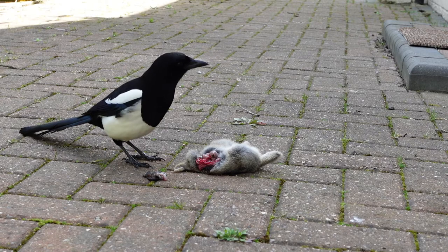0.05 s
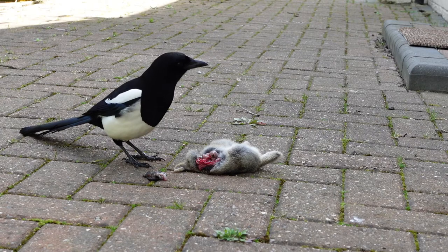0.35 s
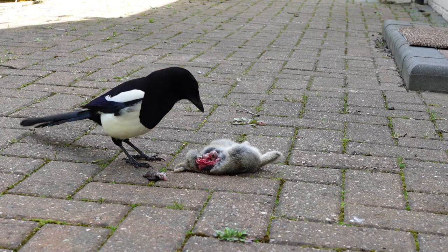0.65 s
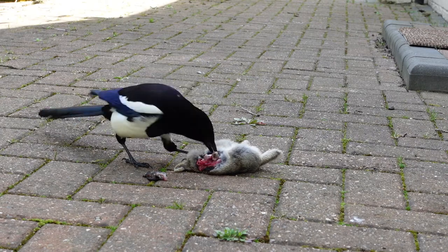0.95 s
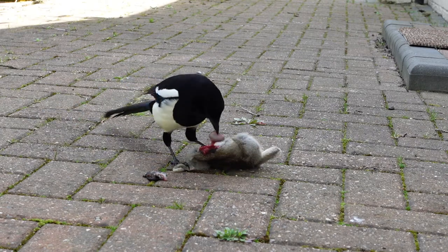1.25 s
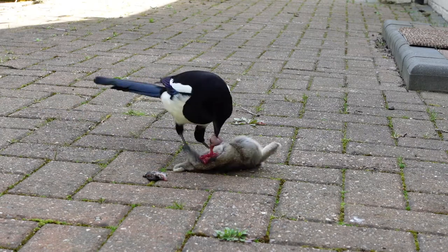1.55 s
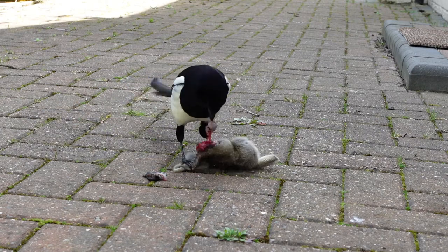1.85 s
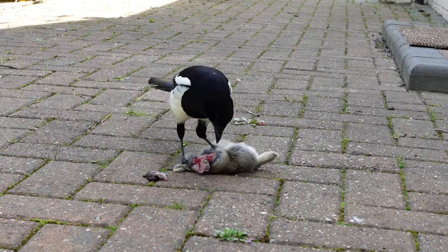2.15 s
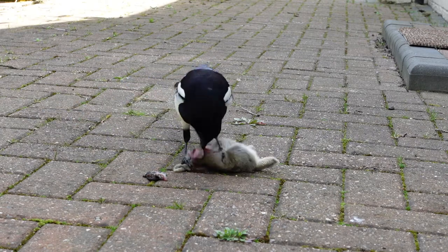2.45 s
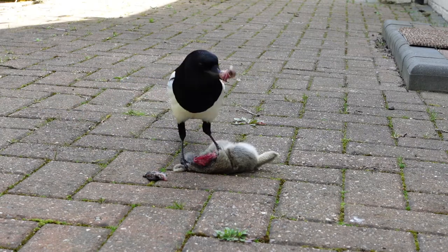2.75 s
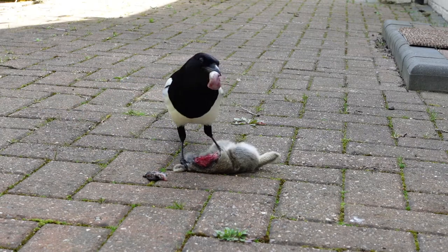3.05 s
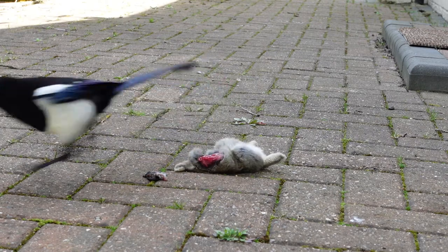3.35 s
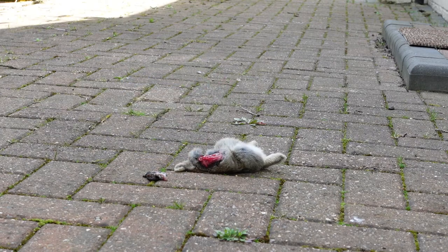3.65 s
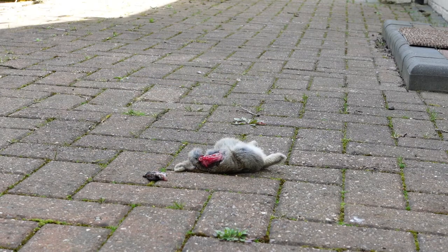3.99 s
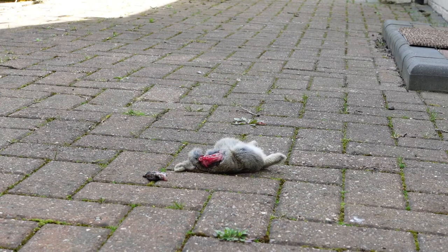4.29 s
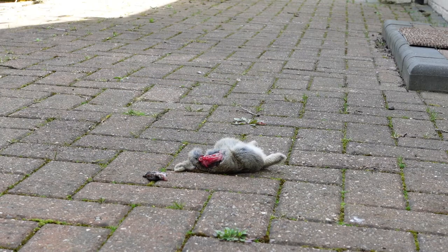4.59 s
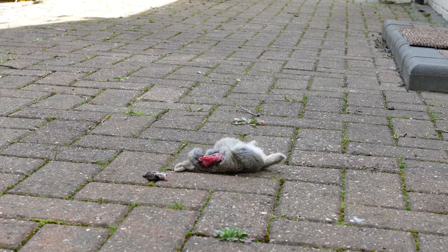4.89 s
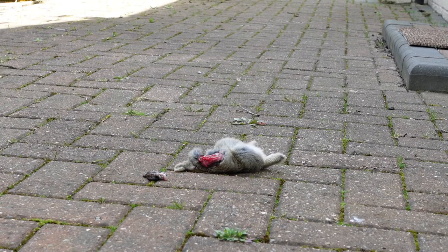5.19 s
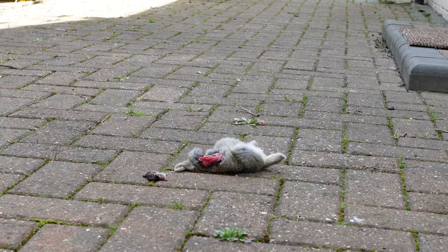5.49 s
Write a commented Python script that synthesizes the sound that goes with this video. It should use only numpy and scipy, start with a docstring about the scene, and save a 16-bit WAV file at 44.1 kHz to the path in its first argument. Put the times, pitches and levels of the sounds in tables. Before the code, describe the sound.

A small bird repeats down-sweeping chirps over distant traffic, while a magpie snaps its bill, then hops off with ticks and a brief flutter.

```python
"""Down-sweeping chirps of a small bird beside a house, thrown back by a wall and ringing in the yard.
Other birds add thin high whistles, a trill and, farther off, fluting. On the paving a magpie pecks,
snaps its bill, hops off and flutters away; soft puffs of air reach the microphone.
Underneath, a distant engine revs in bursts over the rumble of traffic."""
import sys
import numpy as np
from scipy import signal
from scipy.fft import rfft, irfft, next_fast_len
from scipy.io import wavfile
from scipy.ndimage import uniform_filter1d, map_coordinates

SR = 44100
rng = np.random.default_rng(int(sys.argv[2]) if len(sys.argv) > 2 else 0)


def waveform_to_disk(signal):
    """Save audio, clipped to [-1, 1], as 16-bit WAV at the path in sys.argv[1]."""
    frames = np.transpose(np.atleast_2d(signal))
    scaled = np.clip(frames, -1, 1) * 32767
    samples = np.round(scaled).astype(np.int16)
    wavfile.write(sys.argv[1], SR, samples)


N = 248283
TIME = np.arange(N) / SR

# Chirp shapes: (position in the note [0-1], pitch [ratio], level [dB])
SLIDE_SHAPE = [(0, 1.89, -22), (.07, 1.78, -7), (.145, 1.46, 1), (.22, 1.18, -7), (.32, 1.05, -6),
               (.5, 1.0, -2), (.72, .985, -1), (.88, .975, -10), (1, .98, -26)]
ARCH_SHAPE = [(0, .9, -18), (.15, .97, -4), (.36, 1.03, 0), (.55, .99, -1), (.7, .86, -3), (.87, .81, -9),
              (1, .79, -26)]
STEP_SHAPE = [(0, 1.3, 2), (.06, 1.18, -0.5), (.13, .99, 7.5), (.27, 1.01, 1.5), (.36, .95, 3.5),
              (.42, .76, -1.5), (.52, .6, -15.5), (.8, .562, -17.5), (1, .565, -26)]
SLUR_SHAPE = [(0, 1.22, -13), (.12, 1.05, -2), (.25, 1, 2), (.38, .99, -5.5), (.47, 0.74, -8),
              (.6, .68, -15), (.8, .635, -8.5), (1, .63, -28)]
PIP_SHAPE = [(0, .94, -14), (.2, .985, -3), (.5, 1.02, 0), (.8, 1, -4), (1, .96, -16)]
# Chirps sung in each shape: (time [s], length [s], pitch [Hz], level [dB])
SLIDE_NOTES = [(0.69, 0.049, 4050, -20), (1.364, 0.057, 3898, -17.5), (2.03, .054, 4036, -18.5),
               (2.666, 0.066, 4000, -19.5)]
ARCH_NOTES = [(.731, 0.043, 4433, -20), (1.414, 0.052, 4660, -22), (2.082, .06, 4554, -22.5),
              (2.723, 0.044, 4560, -24)]
STEP_NOTES = [(1.021, 0.095, 5767, -22.5), (1.682, 0.096, 5670, -22), (2.336, .106, 5740, -23.5)]
SLUR_NOTES = [(.345, 0.095, 5720, -21.5)]
PIP_NOTES = [(1.13, 0.027, 4037, -25.5), (1.784, 0.056, 4074, -26), (2.463, 0.0493, 3775, -32.5)]
# The top of the song sits right of the microphone: (frequency [Hz], left minus right [dB])
SONG_BALANCE = [(3800, 1), (4600, 1), (5400, -2.5), (7500, -2.5)]

def chirping_bird(wall_delay_s=.0142):
    """A bird beside the house; leaves blur the straight path, so the wall's echo is the louder one."""
    song = notes(SLIDE_SHAPE, SLIDE_NOTES, waver=.013)
    song += notes(ARCH_SHAPE, ARCH_NOTES, waver=.027)
    song += notes(STEP_SHAPE, STEP_NOTES, waver=.018)
    song += notes(SLUR_SHAPE, SLUR_NOTES, waver=.0085)
    song += notes(PIP_SHAPE, PIP_NOTES, waver=.028)
    through_leaves = amp(-15) * song + amp(-14) * scatter(song, t60=.06, delay=0, alike=.5)
    wall = amp(-4) * np.interp(TIME - wall_delay_s, TIME, song, left=0)
    early_yard = amp(-5) * scatter(song, t60=.17, delay=.015, alike=.66)
    late_yard = amp(-11) * scatter(song, t60=.45, delay=.03, alike=.7)
    at_microphone = through_leaves + wall + early_yard + late_yard
    return filtered(at_microphone, lambda hz: amp(np.outer([.5, -.5], along(SONG_BALANCE, hz))))

# Whistles: (time [s], length [s], first, middle, last pitch [Hz], level [dB], left minus right [dB])
THIN_WHISTLES = [(0.916, 0.51, 8090, 8140, 8430, -42, 8), (1.453, .11, 7480, 7100, 7150, -47, 2),
                 (2.16, 0.21, 8725, 8190, 7630, -39.5, 5.5), (2.396, .135, 7320, 6640, 6560, -32.5, -5),
                 (2.561, 0.12, 7420, 6630, 6950, -29, -5.5)]

def whistling_bird(flutter_db=2):
    """A second bird draws out thin, fluttering high notes, left of the microphone and then right."""
    direct = song = 0
    for *call, left_db in THIN_WHISTLES:
        flutter = amp(-2 + flutter_db * wobble(44.9))
        note = flutter * whistle(arc(*call, attack=.25, release=.28, edge_db=-11.5), waver=.0058)
        direct += lean(left_db) * note
        song += note
    early_yard = amp(-9) * scatter(song, t60=.16, delay=.0068, alike=1)
    late_yard = amp(-12) * scatter(song, t60=.61, delay=.023, alike=1)
    return direct + early_yard + late_yard

# One rising note: (position in the note [0-1], pitch [ratio], level [dB])
TRILL_SHAPE = [(0, .98, -20), (.3, .955, -8), (.55, .97, -6), (.76, 1.01, 0), (.9, 1.05, -2),
               (1, 1.07, -18)]
# The run: (time [s], length [s], pitch [Hz], level [dB])
TRILL_NOTES = [(2.73, 0.064, 4990, -30.5), (2.85, 0.054, 4940, -30.5), (2.958, 0.062, 5015, -29),
               (3.07, 0.07, 4950, -28.5), (3.19, 0.066, 4880, -27), (3.314, .055, 4896, -30),
               (3.433, .066, 4840, -28.5)]

def trilling_bird():
    """A soft run of rising notes off to the right, partly blurred by foliage."""
    song = notes(TRILL_SHAPE, TRILL_NOTES, waver=.016)
    blurred = amp(-3) * song + amp(-4) * scatter(song, t60=.07, delay=0, alike=.8)
    yard = amp(-7) * scatter(song, t60=.59, delay=.022, alike=.84)
    return lean(left_db=-4) * blurred + yard

# Ticks on the paving, and the bill shutting: (time [s], level [dB])
PAVING_TICKS = [(1.1199, -39), (1.2526, -33.5), (1.2984, -39), (1.8823, -36), (3.271, -24.5), (3.38, -28.5),
                (3.449, -29), (3.511, -30), (3.5244, -31.5), (3.5662, -24), (3.7569, -33), (3.7978, -31),
                (5.1764, -38), (5.3168, -31.5)]
BILL_SNAP = [(2.675, -11.5)]
# Resonances of the bill: (frequency [Hz], level [dB], time to fall 60 dB [s])
BILL_MODES = [(1020, -22, 0.023), (4600, -33, 0.0028), (8530, 8.5, 0.002), (12000, -7, 0.0054)]

def magpie_clicks(tick_t60=.0042):
    """Out in the yard, claws and bill tick on stone; the bill snaps once with a very short ring."""
    track = np.zeros(N)
    t = np.arange(SR // 20) / SR
    bright = signal.butter(1, [5000, 13000], "bandpass", fs=SR, output="sos")
    for s, db in PAVING_TICKS:
        burst = rng.standard_normal(len(t)) * amp(-60 * t / tick_t60)
        add(track, s, amp(db + 3) * signal.sosfilt(bright, burst))
    ring = sum(amp(db - 60 * t / t60) * np.sin(2 * np.pi * hz * t) for hz, db, t60 in BILL_MODES)
    for s, db in BILL_SNAP:
        add(track, s, amp(db - 2) * ring)
    return track + amp(-11) * scatter(track, t60=.14, delay=.00063, alike=.66)

# The magpie keeps stirring; once it turns and pushes off: (time [s], level [dB])
FIDGET_LEVEL = [(.95, -80), (1.1, -66), (3.05, -62.5), (3.2, -55), (3.65, -58), (4.0, -53), (4.65, -63.5),
                (5.63, -58)]
HOP_LEVEL = [(3.1, -77), (3.16, -41), (3.27, -41), (3.34, -47), (3.42, -80)]
# Brief high hisses (feather and foot scuffs, the bright top of two chirps, the bill snap's tail)
# and dull tugs of the bill: (time [s], half length [s], level [dB])
HIGH_HISSES = [(1.34, .04, -54), (1.71, .03, -56), (2.06, 0.038, -60), (2.46, .02, -57), (2.688, .018, -43),
               (2.78, 0.024, -47.5), (3.19, .045, -45.5), (3.28, 0.05, -45), (3.52, 0.071, -50),
               (3.755, .025, -48.5), (3.855, 0.031, -42.5), (3.915, 0.017, -43), (4.17, .045, -54),
               (4.312, .022, -47), (4.378, 0.016, -46), (4.51, 0.016, -53.5), (4.726, 0.016, -50),
               (5.152, 0.015, -53), (5.32, 0.044, -52)]
BILL_TUGS = [(1.262, 0.013, -49), (1.325, 0.027, -56)]
# The high hiss and the whole plumage: (frequency [Hz], level [dB])
HISS_SPECTRUM = [(400, -10), (1200, 4), (3000, -1), (6000, 0), (9000, 0), (13000, -0.5), (15800, -4.5)]
PLUMAGE_SPECTRUM = [(250, -10), (480, 1), (1300, -8), (3800, 1.5), (6500, -3), (11000, -24)]

def rustle_and_hisses():
    """Grainy rustle of the magpie, with brief high hisses; its hop sweeps the plumage and is fuller."""
    hop_db, = curves(HOP_LEVEL)
    fidget_db, = curves(FIDGET_LEVEL)
    grains = unit(amp(2 * wobble(900) + 1.9 * wobble(60)))
    stirring = amp(fidget_db + 2.7 * wobble(12))
    hiss = amp(2) * np.hypot(stirring, swells(HIGH_HISSES)) * noise(HISS_SPECTRUM)
    body = (amp(hop_db - 2) + swells(BILL_TUGS)) * noise(PLUMAGE_SPECTRUM)
    return grains * (hiss + body)

# Puffs of air: (time [s], half length [s], level [dB])
AIR_PUFFS = [(1.003, 0.025, -39), (1.25, 0.027, -42), (1.326, 0.067, -35.5), (3.742, 0.042, -32.5)]
# Their low thud: (frequency [Hz], level [dB])
PUFF_SPECTRUM = [(20, -34), (50, -9), (85, -3.5), (150, -5), (300, -42), (1000, -70)]

def air_puffs():
    """Soft low puffs of air reach the microphone."""
    return swells(AIR_PUFFS) * noise(PUFF_SPECTRUM)

# Soft, echoing calls: one quiet falling chirp of the nearby bird (two rows), then far birds:
# (time [s], length [s], first, middle, last pitch [Hz], level [dB])
ECHOING_CALLS = [(.003, 0.023, 6920, 5000, 4300, -42), (.02, .055, 4520, 4390, 4315, -35.5),
                 (0.206, 0.13, 8700, 8100, 6600, -60.5), (0.279, 0.57, 1869, 2040, 2050, -47.5),
                 (.565, .11, 4110, 4065, 4284, -39.5), (0.543, .13, 4860, 4900, 5100, -47),
                 (0.792, .18, 2170, 2104, 2310, -37.5), (0.879, .33, 2400, 2344, 2436, -42.5),
                 (3.953, .52, 1908, 1980, 1833, -52), (4.44, .16, 2150, 2380, 2602, -47),
                 (4.539, .16, 5800, 5400, 5100, -59), (4.848, .2, 8460, 7560, 7250, -58.5)]
# A far harsh call, a nearer fluted note, a quick rising squeak: (time [s], pitch [Hz], level [dB])
HARSH_CALL = [(4.77, 4200, -51), (4.83, 4400, -43), (4.88, 4568, -40.5), (4.92, 4650, -56),
              (4.95, 4817, -63)]
FLUTED_NOTE = [(5.39, 2260, -52), (5.44, 2356, -40), (5.485, 2310, -38.5), (5.51, 2133, -45),
               (5.58, 2066, -41.5), (5.63, 2127, -61)]
SQUEAK = [(3.838, 1596, -59), (3.852, 2280, -41), (3.864, 2550, -39), (3.878, 2880, -58)]

def soft_calls():
    """One quiet chirp and the far birds sound as echo alone; fluted note and squeak arrive directly."""
    calls = sum(whistle(arc(*call, attack=.42, release=.37, edge_db=-4), waver=.0318)
                for call in ECHOING_CALLS)
    calls += whistle(HARSH_CALL, waver=.067)
    fluted = whistle(FLUTED_NOTE, waver=.014)
    calls_echo = scatter(calls, t60=.45, delay=0, alike=.82)
    squeak = amp(-1) * lean(left_db=3.6) * whistle(SQUEAK, waver=.057)
    fluted_echo = amp(-4) * scatter(fluted, t60=.2, delay=.011, alike=.56)
    return calls_echo + squeak + amp(-3) * fluted + fluted_echo

# Bursts of throttle: (time [s], length [s], firing rate [Hz], level [dB])
ENGINE_REVS = [(0.398, 0.16, 123, -35), (0.923, 0.39, 124.5, -33), (1.565, 0.15, 121.5, -33.5),
               (3.026, .11, 114.9, -35), (3.662, .29, 122.5, -32.5), (4.082, 0.923, 124, -31),
               (5.37, .13, 121, -38.5)]
# The engine at idle, and a second motor's drone: (time [s], level [dB])
IDLE_LEVEL = [(0, -45), (2.1, -40), (3.0, -43), (3.5, -50), (3.95, -38.5), (5.0, -39), (5.2, -58),
              (5.5, -46)]
DRONE_LEVEL = [(0, -39.5), (.25, -52.5), (1.3, -50), (2.1, -44.5), (2.45, -41.5), (2.9, -45.5), (3.3, -53),
               (4.7, -51), (5.1, -44), (5.63, -44.5)]

def far_motors(idle_hz=111.7, drone_hz=161.1, ramp_s=.086, sag_hz_per_s=7.57, sag_db_per_s=2.5):
    """Far off, the throttle lifts an engine's speed and level; both sag under load while it is held."""
    idle_db, = curves(IDLE_LEVEL)
    drone_db, = curves(DRONE_LEVEL)
    hz, db = idle_hz, idle_db
    for s, length, rev_hz, rev_db in ENGINE_REVS:
        held = TIME - s
        throttle = np.clip(np.minimum(held, length - held) / ramp_s + .5, 0, 1)
        hz = hz + throttle * (rev_hz - sag_hz_per_s * held - idle_hz)
        db = db + throttle * (rev_db - sag_db_per_s * held - idle_db)
        drone_db -= 10.5 * throttle  # the drone fades during a rev
    engine = motor_hum(hz, db - 1, unsteady=.0094, swing_db=.7, octave_db=-19.5)
    drone = motor_hum(drone_hz, drone_db, unsteady=.0214, swing_db=1.5, octave_db=-27.5)
    return engine + drone

def motor_hum(hz, db, unsteady, swing_db, octave_db):
    """A distant hum wavers in speed and level; reflections shift its phase between left and right."""
    phase = 2 * np.pi * np.cumsum(hz * (1 + unsteady * wobble(20))) / SR
    phase = phase + .15 * np.outer([1, -1], wobble(4.1))
    gain = np.sqrt(2) * amp(db + swing_db * wobble(14))
    return gain * (np.sin(phase) + amp(octave_db) * np.sin(2 * phase))

# Rumble from the road: (time [s], level [dB])
ROAD_LEVEL = [(0, -43), (.7, -42), (1.35, -41), (2.1, -43), (2.85, -42), (3.3, -44.5), (4.2, -42.5),
              (5.1, -40.5), (5.63, -40.5)]
# Road rumble and tyre wash: (frequency [Hz], level [dB])
RUMBLE_SPECTRUM = [(15, -65), (25, -48), (38, -19), (64, -17), (92, -4.5), (107, -4), (134, -4.5),
                   (166, -5), (188, -10.5), (219, -6), (248, -13), (271, -11.5), (500, -28), (650, -54),
                   (1100, -120)]
TYRE_SPECTRUM = [(200, -5), (450, -0.5), (650, 2), (950, 5), (1400, 0.5), (1900, -1), (2800, -9),
                 (4500, -6), (6500, -12.5), (9000, -21), (15500, -22)]

def traffic():
    """Distant motors swell and fade over road rumble and tyre wash, a little to the right."""
    road_db, = curves(ROAD_LEVEL)
    rumble = amp(road_db + .66 * wobble(6)) * noise(RUMBLE_SPECTRUM)
    wash = amp(-47 + .32 * wobble(3.11)) * noise(TYRE_SPECTRUM)
    return lean(left_db=-.5) * (far_motors() + rumble + wash)

# Likeness of the microphone's two sides: (frequency [Hz], correlation [0-1])
STEREO_LIKENESS = [(30, 0.091), (70, 0.92), (140, 0.99), (280, 0.64), (1200, 0.69), (5000, 0.72),
                   (12000, 1)]

def noise(spectrum):
    """Coloured stereo noise of rms 1."""
    def response(hz):
        width = np.arccos(np.clip(along(STEREO_LIKENESS, hz), -1, 1)) / 2
        return amp(along(spectrum, hz)) * [np.cos(width), np.sin(width)]
    mid, side = filtered(rng.standard_normal((2, N)), response)
    return unit(np.array([mid + side, mid - side]))

def whistle(rows, waver, overtone_db=-44):
    """One nearly pure syrinx tone along (time [s], pitch [Hz], level [dB]) rows; its pitch trembles."""
    start, end = rows[0][0], rows[-1][0]
    t = np.arange(start, max(end, start + .01), 1 / SR)
    hz, db = curves(rows, t)
    tremble = map_coordinates(rng.standard_normal(1024), [(t - start) * 350], mode="mirror")
    phase = 2 * np.pi * np.cumsum(uniform_filter1d(hz, size=90) * (1 + waver * tremble)) / SR
    tone = np.sin(phase) + amp(overtone_db) * np.sin(2 * phase)
    fade = np.clip(np.minimum(t - start, t[-1] - t) / .002, 0, 1)
    track = np.zeros(N)
    add(track, start, np.sqrt(2) * fade * amp(db) * tone)
    return track

def notes(shape, table, waver):
    """A note shape, stretched and transposed for each row."""
    song = np.zeros(N)
    for s, length, hz, db in table:
        rows = [(s + u * length, hz * ratio, db + shape_db) for u, ratio, shape_db in shape]
        song += whistle(rows, waver, overtone_db=-41)
    return song

def arc(s, length, first_hz, middle_hz, last_hz, db, attack, release, edge_db):
    """Rows of a note that scoops up into a curved glide; attack and release are shares of its length."""
    u = np.linspace(0, 1, 33)
    glide_hz = np.polyval(np.polyfit([0, .5, 1], [first_hz, middle_hz, last_hz], deg=2), u)
    scoop = 1 - .0453 * np.exp(-u / .0695)
    opening = np.clip(np.minimum(u / attack, (1 - u) / release), 0, 1)
    return np.transpose([s + u * length, glide_hz * scoop, db + edge_db * (1 - opening)])

def scatter(x, t60, delay, alike, size=16384):
    """Diffuse stereo echo from walls, paving and hedges; its pattern drifts as birds and leaves move."""
    t = np.arange(size) / SR
    decay = amp(-60 * t / t60) * np.clip((t - delay) / .0024, 0, 1)
    width = np.arccos(np.clip(alike, -1, 1)) / 2
    window = np.sin(np.pi * np.arange(size) / size)
    padded = np.pad(x, (size // 2, size))
    out = np.zeros((2, len(padded) + size))
    for start in range(0, N + size // 2, size // 2):  # a fresh tail for each overlapping piece
        mid, side = rng.standard_normal((2, size)) * decay / np.linalg.norm(decay)
        piece = padded[start:start + size] * window
        if piece.any():
            tail = np.cos(width) * mid + np.sin(width) * np.array([side, -side])
            out[:, start:start + 2 * size - 1] += signal.fftconvolve(piece[None], tail, axes=1)
    return out[:, size // 2:][:, :N]

def amp(db):
    """Decibels to gain."""
    return 10 ** (np.asarray(db) / 20)

def unit(x):
    """x at rms 1."""
    return x / np.sqrt(np.mean(x ** 2) + 1e-20)

def along(points, hz):
    """(frequency [Hz], value) points read on a log axis."""
    knots_hz, values = np.transpose(points)
    return np.interp(np.log(hz + 1), np.log(knots_hz + 1), values)

def curves(rows, t=TIME):
    """Each column after the time column, joined by straight lines."""
    s, *columns = np.transpose(rows)
    return [np.interp(t, np.sort(s), column) for column in columns]

def swells(rows):
    """A bell-shaped gain for each (time [s], half length [s], level [dB]) row."""
    return sum(amp(db) * np.exp(-((TIME - s) / half) ** 2) for s, half, db in rows)

def wobble(rate):
    """A smooth random curve with rate knots a second."""
    return map_coordinates(rng.standard_normal(int(N * rate / SR) + 4), [TIME * rate])

def filtered(x, response):
    """x shaped by a gain that depends on frequency."""
    size = next_fast_len(N + SR // 2)
    return irfft(rfft(x, size) * response(np.fft.rfftfreq(size, 1 / SR)), size)[..., :N]

def add(track, s, sound):
    """Mix a sound into a track from second s on."""
    part = track[max(round(s * SR), 0):][:len(sound)]
    part += sound[:len(part)]

def lean(left_db):
    """Channel gains, the left louder than the right by left_db."""
    return amp([[left_db / 2], [-left_db / 2]])

def scene():
    """Birds, magpie and traffic as heard from the yard."""
    birds = chirping_bird() + whistling_bird() + trilling_bird() + soft_calls()
    return birds + rustle_and_hisses() + magpie_clicks() + air_puffs() + traffic()

def record(dry, dip_s=4.58, dip_half_s=.0055, dip_db=-15, top_hz=16000):
    """The level dips briefly once; the camera keeps nothing above its band limit."""
    dip = amp(dip_db * swells([(dip_s, dip_half_s, 0)]))
    return filtered(dry * dip, lambda hz: hz < top_hz)

dry = scene()
out = record(dry)
waveform_to_disk(out)
```